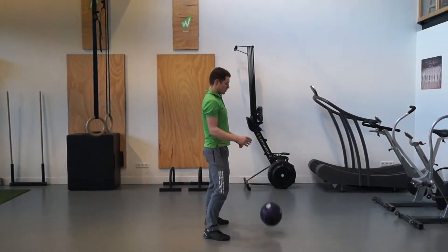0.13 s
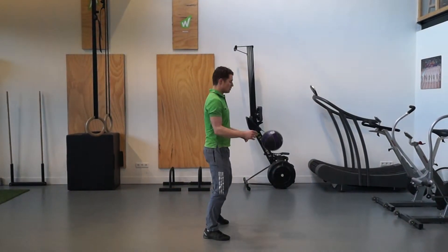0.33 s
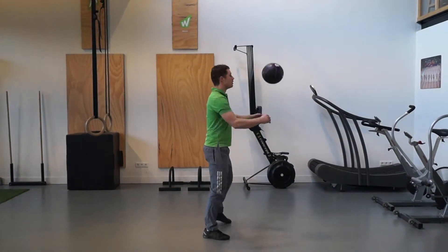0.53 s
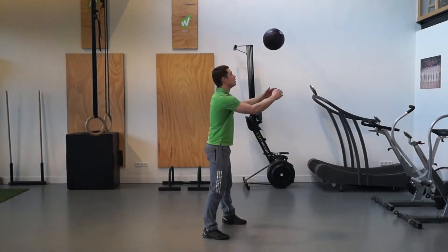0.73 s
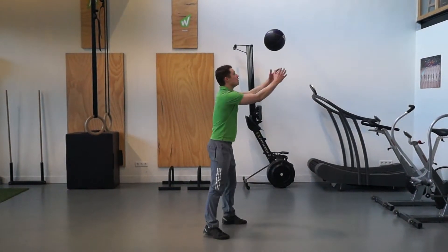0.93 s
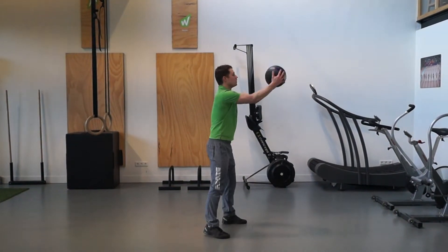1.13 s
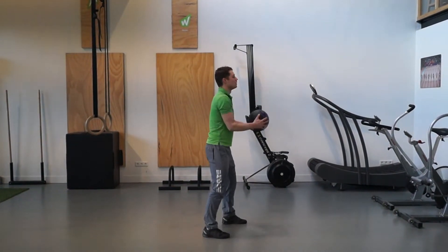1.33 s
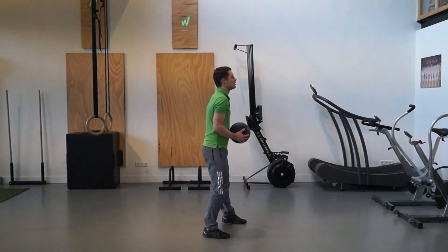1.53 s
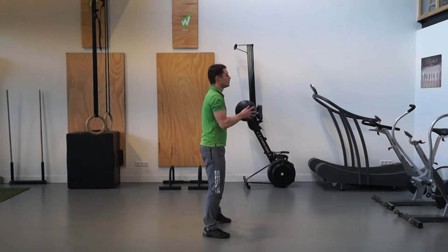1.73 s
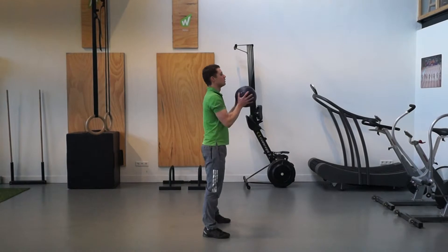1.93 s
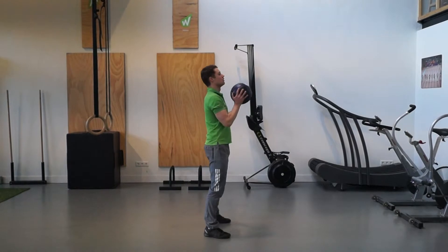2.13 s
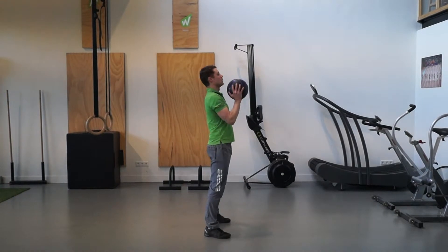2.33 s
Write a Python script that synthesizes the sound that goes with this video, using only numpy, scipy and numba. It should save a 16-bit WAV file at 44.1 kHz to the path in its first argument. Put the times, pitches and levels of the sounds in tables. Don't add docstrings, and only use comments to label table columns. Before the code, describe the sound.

Loud slam of a weighted ball on a hard floor in an echoing hall, then a softer two-handed catch

```python
import sys
import numpy as np
from scipy import signal
from scipy.fft import rfft, irfft, next_fast_len
from scipy.io import wavfile
from numba import njit

SR = 44100
rng = np.random.default_rng(int(sys.argv[2]) if len(sys.argv) > 2 else 0)


def boost(x):
    u = np.asarray(x, float) / 20
    return 10 ** u


def log_audio(samples):
    frames = np.atleast_2d(samples).T
    limited = np.clip(frames, -1, 1)
    pcm = np.round(limited * 32767).astype(np.int16)
    wavfile.write(sys.argv[1], SR, pcm)


N = 105840


def unit(x):
    return x / np.sqrt(np.mean(x ** 2) + 1e-20)


def energy_one(x):
    return x / np.linalg.norm(x)


def peak_at(x, db):
    return boost(db) * x / np.abs(x).max()


def along(points, hz):
    f, v = np.transpose(points)
    return np.interp(np.log(hz + 1), np.log(f + 1), v)


def filtered(x, response):
    m = next_fast_len(N + SR // 2)
    return irfft(rfft(x, m) * response(np.fft.rfftfreq(m, 1 / SR)), m)[..., :N]


def resonant(peaks):
    def response(hz):
        total = 0
        for k, (centre, width, db) in enumerate(peaks):
            damping = 1j * hz * width
            total = total + (-1) ** k * boost(db) * damping / (centre * centre - hz * hz + damping)
        return total
    return response


def in_phase(peaks):
    return lambda hz: sum(resonant([mode])(hz) for mode in peaks)


def causal(spectrum):
    def response(hz):
        cepstrum = irfft(np.log(boost(along(spectrum, hz)) + 1e-6))
        k = np.arange(len(cepstrum))
        fold = np.where(k == 0, 1, 2 * (k < len(cepstrum) // 2))
        return np.exp(rfft(cepstrum * fold))
    return response


def pair(alike, lead=((1, 0),)):
    def mid_side(hz):
        turn = np.arccos(np.clip(along(alike, hz), -1, 1)) / 2
        return np.array([np.cos(turn), np.sin(turn)])

    def phase(hz):
        return np.exp(.5j * along(lead, hz) * np.array([[1], [-1]]))

    mid, side = filtered(rng.standard_normal((2, N)), mid_side)
    return filtered(np.array([mid + side, mid - side]), phase)


def spike(s, db=0):
    return boost(db) * (np.arange(N) == round(s * SR))


def burst(s, rise, t60):
    t = np.arange(N) / SR - s
    swell = np.clip(1 + t / rise, 0, 1) ** 2
    return rng.standard_normal(N) * swell * boost(-60 * np.clip(t, 0, 9) / t60)


# frequency in Hz, density in dB per Hz.
AIR_SPECTRUM = [(18, -77), (30, -25), (153, -8.5), (266, -4), (526, -3), (2410, -9), (4080, -14),
                (14400, -24), (16000, -30.5)]
# frequency in Hz, left-right likeness from -1 to 1.
AIR_COHERENCE = [(60, 0.98), (180, 0.91), (550, -0.36), (1650, -0.43), (4970, -0.24), (15000, 0.25)]


def air():
    return boost(-56) * unit(filtered(pair(AIR_COHERENCE), lambda hz: boost(along(AIR_SPECTRUM, hz))))


# frequency in Hz, t60 in seconds.
HALL_T60 = [(60, 1.52), (200, 1.23), (500, 1.42), (1500, 1.47), (3500, 1.32), (7000, 0.93), (12000, .55),
            (16000, .4)]
# frequency in Hz, left-right likeness from -1 to 1.
HALL_COHERENCE = [(60, 0.82), (130, 0.93), (300, 1), (600, 0.79), (1500, 0.63), (4000, 0.52),
                  (10000, -0.056)]
# frequency in Hz, lead in radians.
PORT_LEAD = [(60, 0.45), (200, 0.54), (500, 0.73), (1200, .5), (3000, 0.15)]


def hall(x, db):
    gap_s, rise_s, pan_db = 0.0008, 0.0083, -0.52
    hz, t, z = signal.stft(pair(HALL_COHERENCE, PORT_LEAD), SR, nperseg=256)
    decay = boost(-60 * t / along(HALL_T60, hz)[:, None])
    tail = signal.istft(z * decay, SR, nperseg=256)[1][:, :N]
    build_up = 1 - np.exp(-np.arange(N) / SR / rise_s)
    tail = tail * build_up * boost([[pan_db], [-pan_db]])
    late = np.pad(x, (round(gap_s * SR), 0))[None]
    return boost(db) * signal.fftconvolve(late, tail, axes=1)[:, :N]


# frequency in Hz, width in Hz, level in dB.
BALL_MODES = [(253.6, 12, 0.5), (302.5, 22.7, 0), (418, 75, -1), (446, 35, 2), (542, 40, -8.5),
              (658, 65, -10), (745, 15, -4.5), (810, 34, -27)]
# frequency in Hz, density in dB per Hz.
SLAM_SPECTRUM = [(30, -62.5), (90, -29), (300, -10), (520, -6), (1050, -19.5), (1700, -15), (5000, -20.5),
                 (15500, -30)]
# delay in seconds, level in dB, pan in dB.
WALL_ECHOES = [
    (0.0115, -61, 0),
    (0.0155, -45, 3),
    (0.0254, 1.5, -18),
    (.0325, -37, 2),
    (.037, -11, 2),
]
# frequency in Hz, level in dB, t60 in seconds, pan in dB.
STANDING_WAVES = [(62.6, -54, 2.7, -2), (70.4, -50, 2.7, 1), (121, -50, 1.5, 0), (158, -48, 1.4, 0)]


def slam():
    slam_s = 0.2176
    t = np.arange(N) / SR - slam_s

    slab_lead_s, slab_hz, slab_s = 0.00363, 790, 0.0012
    slab_t = t + slab_lead_s
    slab = boost(-19.5) * np.exp(-(slab_t / slab_s) ** 2) * np.cos(2 * np.pi * slab_hz * slab_t)

    kick = spike(slam_s, -1.2) - spike(slam_s + 0.00015, 5.2)
    kick = kick + 0.21 * burst(slam_s, 0.0002, 0.004)
    crack = peak_at(filtered(kick, resonant([(2140, 1050, 21), (11300, 2700, -6)])), -2.5)

    thump_lag_s, contact_s = 0.002174, 0.00058
    push = np.exp(-(2 * (t - thump_lag_s) / contact_s) ** 2)
    thump = filtered(push, in_phase(BALL_MODES))
    direct = (crack + peak_at(thump, 0)) * boost([[-1.5], [1.5]])

    echoes = 0
    for delay_s, db, pan in WALL_ECHOES:
        echoes = echoes + np.roll(crack, round(delay_s * SR)) * boost([[db + pan / 2], [db - pan / 2]])

    boom = 0
    for hz, db, t60, pan in STANDING_WAVES:
        level = boost(db - 60 * t / t60 + np.array([[pan], [-pan]]))
        boom = boom + (t > 0) * level * np.sin(2 * np.pi * hz * t)

    broad = filtered(spike(slam_s), causal(SLAM_SPECTRUM))
    reverberation = hall(energy_one(broad), -9.5) + hall(energy_one(thump), -12.5)
    return slab * boost([[-2.5], [2.5]]) + direct + echoes + boom + reverberation


# time in seconds, level in dB, rise in seconds, t60 in seconds.
PALM_HITS = [
    (1.1672, -17, 0.0044, 0.07),
    (1.1775, -10, 0.0013, 0.029),
    (1.1844, -14.5, 0.00086, 0.027),
]
# frequency in Hz, density in dB per Hz.
SLAP_SPECTRUM = [(110, -51), (240, -12), (600, -16.5), (1050, -14), (1700, -11.5), (3500, -8.5),
                 (5500, -14.5), (15500, -21.5)]
# frequency in Hz, width in Hz, level in dB.
CUP_MODES = [(287, 58, 6), (2020, 220, -2.5), (3400, 910, -1.5), (4100, 790, -7.5), (6900, 1300, -6.5)]
# frequency in Hz, level in dB, t60 in seconds.
BALL_HUM = [(279, -49, 1.0), (293, -47, 1.1), (370, -44, .12)]


def catch():
    def colour(hz):
        return causal(SLAP_SPECTRUM)(hz) * (1 + in_phase(CUP_MODES)(hz))

    slap = 0
    for s, db, rise, t60 in PALM_HITS:
        puffs = np.array([burst(s, rise, t60), burst(s, rise, t60)])
        slap = slap + peak_at(filtered(puffs, colour), db)
    slap = slap + 0.44 * slap[::-1]

    first_s, second_s = PALM_HITS[0][0], PALM_HITS[1][0]
    t = np.clip(np.arange(N) / SR - first_s, 0, 9)
    hum = sum(boost(db - 60 * t / t60) * np.sin(2 * np.pi * hz * t) for hz, db, t60 in BALL_HUM)
    hum = hum * (1 - np.exp(-t / 0.0041))

    blows = filtered(spike(first_s, -1.3), colour), filtered(spike(second_s), colour)
    size = np.linalg.norm(blows[1])
    return hum + slap / 2 + sum(hall(blow / size, -32.5) for blow in blows)


# time in seconds, effort in dB.
RUB_EFFORT = [
    (1.4, -70),
    (1.6, -57),
    (1.73, -58.5),
    (1.785, -49),
    (1.861, -52),
    (1.95, -56),
    (2.101, -61.5),
    (2.4, -74),
]
# frequency in Hz, density in dB per Hz.
RUB_SPECTRUM = [(180, -56), (300, -16), (455, -10), (511, -8), (555, -11), (2400, -11.5), (16000, -28)]
# time in seconds, level in dB.
FINGER_TAPS = [(1.981, -48.5), (2.001, -43), (2.02, -52), (2.039, -57), (2.059, -46), (2.068, -53),
               (2.081, -59), (2.099, -57), (2.12, -53.5), (2.146, -53.5), (1.854, -50)]
# frequency in Hz, width in Hz, level in dB.
TAP_MODES = [(865, 150, 1), (1240, 430, -2), (1750, 510, -6)]


def handling():
    effort_db = np.interp(np.arange(N) / SR, *np.transpose(RUB_EFFORT), left=-120)
    rub = unit(filtered(pair(HALL_COHERENCE), lambda hz: boost(along(RUB_SPECTRUM, hz))))

    def tap_colour(hz):
        return in_phase(TAP_MODES)(hz) / (1 + (hz / 2160) ** 6)

    touches = sum(boost(db + 12) * burst(s, 0.0026, 0.011) for s, db in FINGER_TAPS)
    taps = filtered(touches, tap_colour)
    return boost(effort_db) * rub + taps + hall(taps, -28.5)


def scene():
    return air() + slam() + catch() + handling()


@njit
def follow(x, up, down):
    out, level = np.empty_like(x), 0.0
    for i in range(len(x)):
        level += (up if x[i] > level else down) * (x[i] - level)
        out[i] = level
    return out


def band_limit(x):
    return signal.sosfilt(signal.butter(12, 16680, fs=SR, output="sos"), x)


def record(dry):
    ceiling_db, attack_s, release_s = -10, 0.00033, 0.013
    low_cut_hz, top_hz, top_cut_db = 55, 16000, -60
    level = follow(np.abs(dry).max(0), min(1, 1 / (attack_s * SR)), 1 / (release_s * SR))
    held = dry * np.minimum(1, boost(ceiling_db) / (level + 1e-9))

    def band(hz):
        return 1j * hz / (low_cut_hz + 1j * hz) * np.where(hz < top_hz, 1, boost(top_cut_db))

    return band_limit(filtered(held, band))


dry = scene()
out = record(dry)
log_audio(out)
```